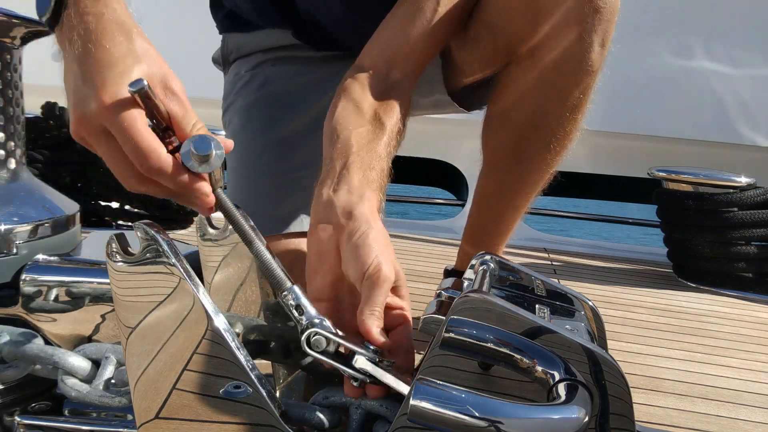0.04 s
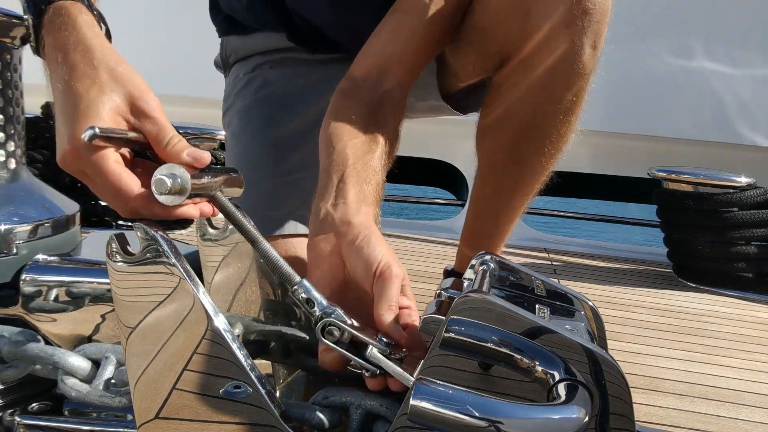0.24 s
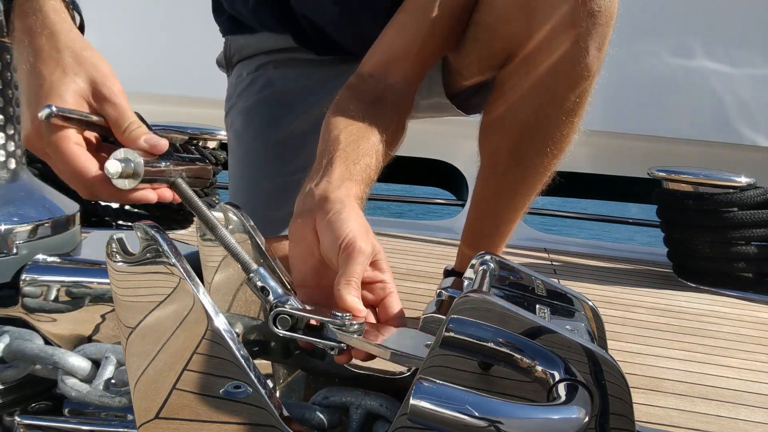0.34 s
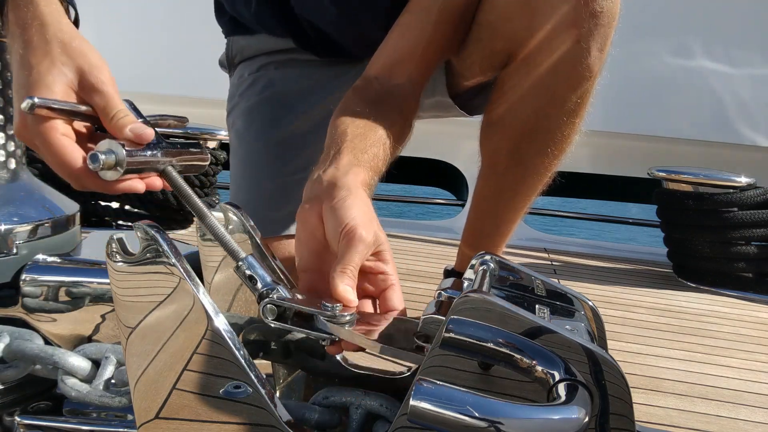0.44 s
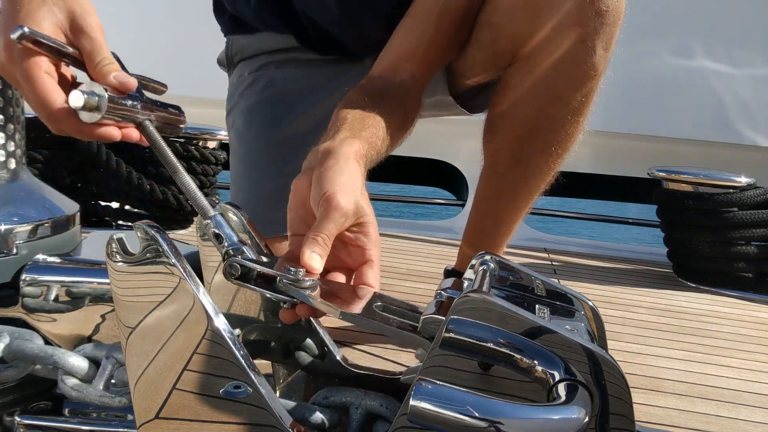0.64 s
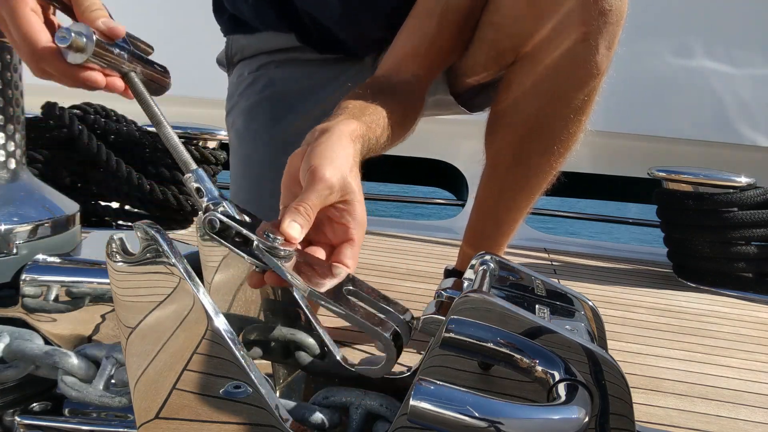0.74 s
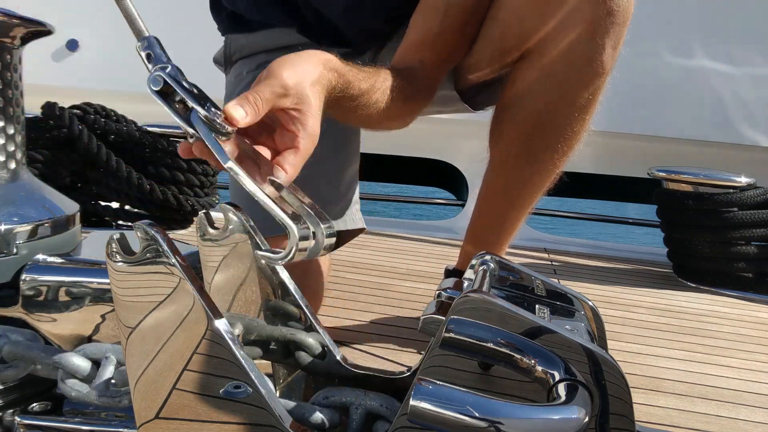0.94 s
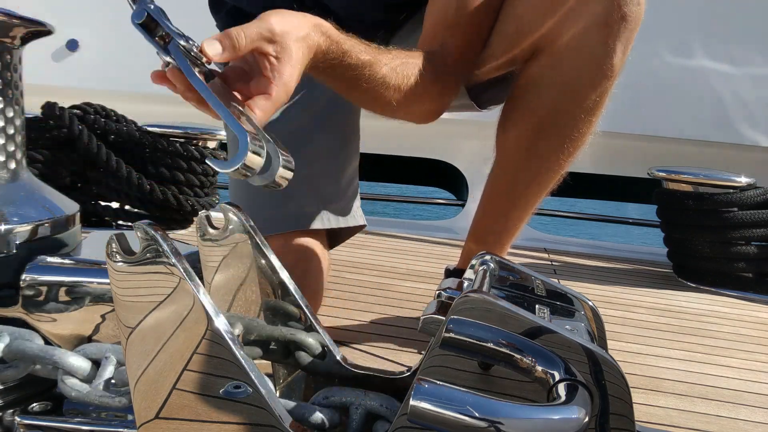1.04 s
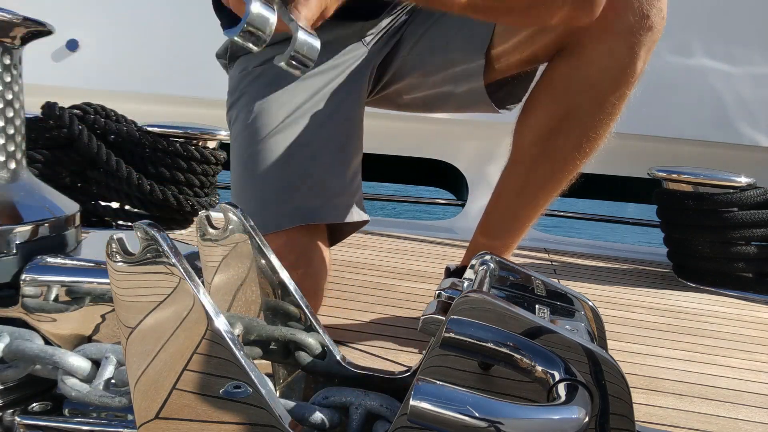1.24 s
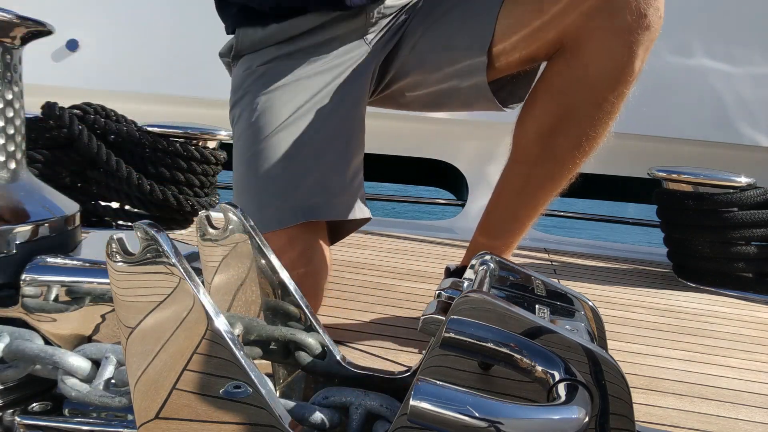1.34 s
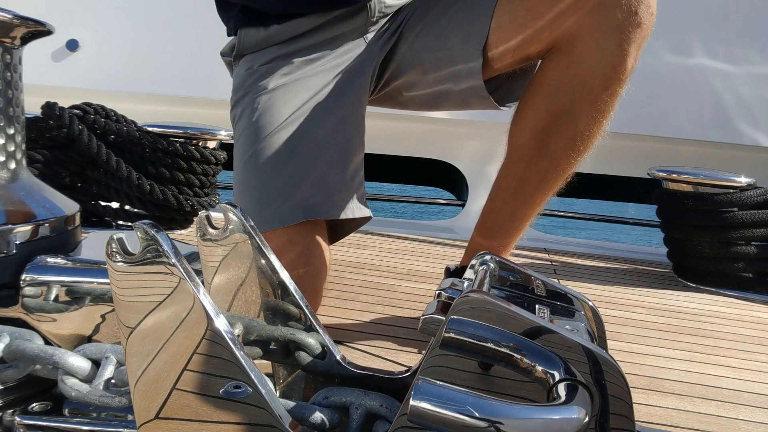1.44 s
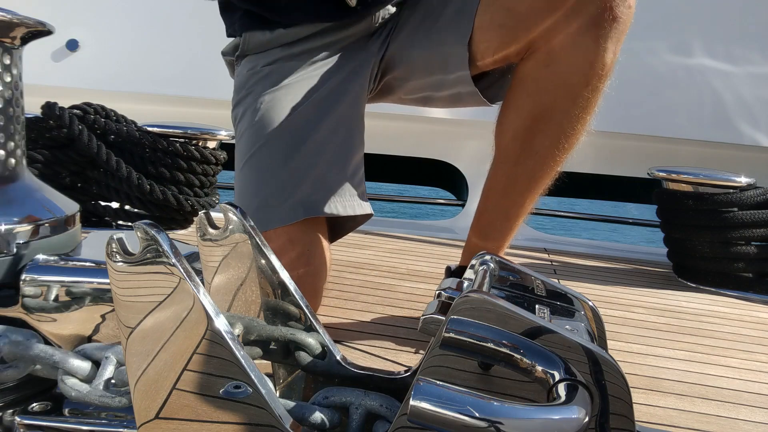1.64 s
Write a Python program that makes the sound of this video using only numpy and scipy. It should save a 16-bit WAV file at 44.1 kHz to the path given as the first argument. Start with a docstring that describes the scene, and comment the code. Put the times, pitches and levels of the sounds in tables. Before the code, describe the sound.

Metal clank of a heavy securing claw knocked off chain, ringing on, then faint ticks outdoors

```python
"""On a boat's foredeck in the open air, a steel securing claw is worked off an anchor chain, close by.
It scrapes, breaks loose with a rattling clank, knocks again and rings on as it is lifted away; fittings tick.
Contacts shape resonance-coloured noise; rod, claw, links and deck are sums of decaying modes; a groan slides.
A wavering sine hums low beneath, with filtered noise for the harbour air and the rumble of handling."""
import sys
import numpy as np
from scipy import signal
from scipy.fft import rfft, irfft
from scipy.io import wavfile

SR = 44100
rng = np.random.default_rng(int(sys.argv[2]) if len(sys.argv) > 2 else 0)


def master(y):
    """Save y as 16-bit WAV."""
    cut = np.clip(np.atleast_2d(y).T, -1, 1)
    pcm = np.round(cut * 32767)  # scale
    wavfile.write(sys.argv[1], SR, pcm.astype(np.int16))


N = 74970


def undb(db):
    """Level to amplitude: 20 dB is a factor of ten."""
    return 10 ** (np.asarray(db) / 20)


def unit(x):
    """Normalisation to an rms of 1."""
    return x / np.sqrt(np.mean(x ** 2))


def wander(size, step):
    """Slow random modulation of rms 1: random values every step points, joined by straight lines."""
    at = np.arange(size) / step
    return unit(np.interp(at, np.arange(size), rng.standard_normal(size)))


def noise(colour):
    """Spectral shaping: white noise weighted by (f/Hz, level/dB) points, at rms 1."""
    hz, db = np.array(colour).T
    f = np.maximum(np.fft.rfftfreq(N, 1 / SR), 1)
    gain = undb(np.interp(np.log(f), np.log(hz), db))
    return unit(irfft(rfft(rng.standard_normal(N)) * gain, N))


def since(start):
    """Elapsed time in seconds since start, zero before it."""
    return np.maximum(np.arange(N) / SR - start, 0)


def strike(start, rise, t60):
    """Impact envelope: a quick rise, then exponential decay by 60 dB in t60 seconds."""
    age = since(start)
    attack = 1 - np.exp(-age / max(rise, 1e-5))
    return attack * np.exp(-np.log(1000) * age / t60)


def ring(start, hz, t60, rise):
    """Free vibration of one struck mode: a decaying sine."""
    return strike(start, rise, t60) * np.sin(2 * np.pi * hz * since(start))


def struck(modes, blows):
    """Modal superposition: each mode keeps its phase while every blow adds to its amplitude."""
    age = since(blows[0][0])
    out = np.zeros(N)
    for hz, db, t60 in modes:
        swing = sum(undb(blow_db) * strike(start, 2e-4, t60) for start, blow_db in blows)
        out += undb(db) * swing * np.sin(2 * np.pi * hz * age)
    return out


def machinery_hum():
    """Frequency and amplitude modulation: a low sine whose pitch and level waver at random."""
    # swell of the hum: t/s, level relative to hum_db/dB
    hum_swell = [(0, -3.5), (.2, 6), (0.601, 0.5), (0.802, 5), (1.041, 4), (1.1, -1), (1.36, -3.5),
                 (1.469, 3), (1.7, 2.5)]
    hum_hz, hum_db = 75.8, -53.5
    waver, drift = 0.23, 0.013  # rms share of amplitude, of frequency
    hz = hum_hz * (1 + drift * wander(N, SR / 12))
    tone = np.sin(2 * np.pi * np.cumsum(hz) / SR)
    hum = unit((1 + waver * wander(N, SR / 10)) * tone)
    swell = np.interp(np.arange(N) / SR, *np.array(hum_swell).T)
    return undb(hum_db + swell) * hum


def harbour_air():
    """Stationary broadband noise: a steady spectrum weighted towards the low frequencies."""
    # spectrum of the air: f/Hz, relative level per Hz/dB
    air_colour = [(25, -28.5), (55, -5), (100, -8.5), (160, -8), (230, -19.5), (335, -24), (430, -21),
                  (730, -31.5), (1500, -32), (4000, -34.5), (8000, -41.5), (16000, -45.5)]
    air_db = -55.5
    return undb(air_db) * noise(air_colour)


def handling_rumble():
    """Amplitude-modulated noise: low-frequency rumble follows the handling."""
    # course of the rumble: t/s, level/dB
    rumble_levels = [(0, -43.5), (.12, -54), (.33, -45), (.45, -43), (.6, -49.5), (0.751, -52),
                     (1.05, -53.5), (1.3, -62), (1.7, -54)]
    # its spectrum: f/Hz, relative level/dB
    rumble_colour = [(30, -22), (70, -0.5), (160, -1), (300, -14.5), (600, -20.5), (1500, -30.5),
                     (6000, -49.5)]
    level = np.interp(np.arange(N) / SR, *np.array(rumble_levels).T)
    return noise(rumble_colour) * undb(level)


def tensioning_rod():
    """Added damping: the knocked rod rings in its modes until the tightening grip mutes it."""
    # rod modes: f/Hz, relative level/dB, t60 before muting/s
    rod_modes = [(449.5, -1.5, 1), (680, -13, .11), (950, -17, 0.19)]
    # knocks on the rod: t/s, level/dB
    rod_knocks = [(.009, -43), (0.148, -41.5), (0.171, -40)]
    held_s, fade_s = 0.18, 0.016  # start and time constant of the muting
    return struck(rod_modes, rod_knocks) * np.exp(-since(held_s) / fade_s)


def clatter():
    """High modal density: contacts excite chain and stopper as noise in bands; the deck answers late and long."""
    # steel-on-steel contacts: t/s, basic rise/s, basic t60/s, then level/dB at each of clatter_hz
    contacts = [ (0.14, 0.0023, 0.19, -64, -49.5, -71, -74, -94, -87),
                (0.167, 0.0099, 0.17, -43, -39, -44.5, -48.5, -44.5, -64),
                (0.1949, 0.00083, 0.055, -60, -50, -44, -33, -65, -65.5),
                (0.2115, 0.00031, 0.074, -45, -34.5, -18, -12.5, -10, -17),
                (0.2267, .002, .08, -46, -30.5, -44, -24, -20, -30),
                (0.2556, 0.0022, .08, -46, -36, -37, -29.5, -26.5, -34),
                (0.267, 0.0031, .09, -49, -38, -36, -45.5, -46, -55),
                (0.296, .002, 0.22, -39.5, -45.5, -51.5, -57, -39, -79),
                (0.375, 0.00093, 0.069, -48.5, -42, -53.5, -43, -45, -69),
                (.402, .003, 0.068, -42.5, -35.5, -37.5, -37.5, -54, -44),
                (0.486, 0.0021, 0.12, -39, -41.5, -45, -50.5, -62, -75),
                (0.5015, 0.00063, 0.041, -39, -32.5, -40, -20, -34, -43),
                (0.505, .0005, 0.032, -45.5, -36, -39.5, -22.5, -45, -54)]
    # frequencies of those levels: f/Hz
    clatter_hz = [180, 700, 2200, 5300, 9000, 13500]
    # broad colour of chain and stopper: f/Hz, level before band normalisation/dB
    body_colour = [(700, 3.5), (1100, -5), (1550, 3), (1850, -3), (2300, -1), (4500, -6), (5300, 1),
                   (6700, -4.5), (8000, -0.5), (8600, 4.5), (10000, 7.5), (11800, -3), (14500, -1),
                   (16000, -5)]
    tail_db, tail_t60_s = -23.5, .3  # the chain goes on shivering
    tail_knee_hz, tail_shortening = 1000, 0.41  # above the knee t60 falls with this power of frequency
    bass_hz, bass_lag_s, bass_t60_s = 260, 0.021, .3  # the deck's extra rise and decay, weighted to the bass
    resonance_hz, resonance_db = 55.05, 4  # spacing and rms depth of the dense steel resonances
    grain_db = 2.5  # rms depth of the chatter
    f = np.maximum(np.fft.rfftfreq(N, 1 / SR), 1)
    resonances = undb(resonance_db * wander(len(f), resonance_hz * N / SR))
    body = undb(np.interp(f, *np.array(body_colour).T))
    steel = rfft(rng.standard_normal(N)) * resonances * body
    chatter = unit(undb(grain_db * wander(N, SR / 1000)))
    out = np.zeros(N)
    for hz in 125 * 2 ** (np.arange(15) / 2):  # half-octave centres
        overlap = np.clip(1 - 2 * abs(np.log2(f / hz)), 0, 1)
        band = unit(irfft(steel * overlap, N))
        bass = 1 / (1 + (hz / bass_hz) ** 2)
        tail_t60 = tail_t60_s / max(hz / tail_knee_hz, 1) ** tail_shortening
        power = np.zeros(N)
        for start, rise, t60, *levels in contacts:
            rise = rise + bass * bass_lag_s
            fall = strike(start, rise, t60 + bass * bass_t60_s)
            fall = fall + undb(tail_db) * strike(start, rise, tail_t60)
            level = np.interp(np.log(hz), np.log(clatter_hz), levels)
            power += (fall * undb(level)) ** 2
        out += band * np.sqrt(power)
    return out * chatter


def claw():
    """Contact damping: each blow's ring is stopped in turn, briefly while pressed on the chain, long once free."""
    # claw modes: f/Hz, relative level/dB, t60 when free/s
    claw_modes = [(895, -7.5, 0.44), (1492, -4, 0.42), (3375, -18, .3), (3542, 3, 1.0), (4216, -2.5, .24),
                  (4985, 3.5, 0.052), (5240, 2, 0.094), (5680, -21.5, .4), (6500, -4, 0.42),
                  (7080, 1, 0.32), (8926, -1.5, 0.91), (10330, -3.5, 0.11), (11404, 0.5, .24)]
    # blows on the claw: t/s, stopped at t/s, share of free t60, then level/dB at each of claw_hz
    claw_blows = [ (.174, 0.207, 0.54, -42, -41, -63.5, -54.5, -58, -61.5),
                  (.197, 0.22, 0.42, -32, -33, -38, -42, -61, -60.5),
                  (0.2145, 0.293, 0.2, -41, -5.5, -33, -36, -19.5, -22.5),
                  (0.241, .3, 1, -43.5, -45.5, -50.5, -55, -27, -30.5),
                  (.298, 0.384, 1, -41.5, -39, -67, -44.5, -27, -45.5),
                  (0.387, 0.508, 1, -46.5, -60, -62, -59, -33, -76),
                  (.5022, 1.077, 0.93, -40.5, -42, -34.5, -69.5, -27, -23)]
    # frequencies of those levels: f/Hz
    claw_hz = [1500, 3540, 5000, 7100, 8920, 11390]
    stop_s, rise_s = 0.002, 0.00096
    # the claw turns and a silent lobe of one mode sweeps past
    node_s, node_width_s, node_mode_hz = 0.562, 0.025, 8919
    waver_db, waver_rate = 1.58, 25  # the claw moves in the hand: rms depth, new values per s
    t = np.arange(N) / SR
    gates = [.5 - .5 * np.tanh((t - blow[1]) / stop_s) for blow in claw_blows]
    out = np.zeros(N)
    for hz, db, t60 in claw_modes:
        swing = np.zeros(N)
        for (start, _, share, *levels), gate in zip(claw_blows, gates):
            level = db + np.interp(hz, claw_hz, levels)
            swing += undb(level) * strike(start, rise_s, t60 * share) * gate
        near_node_mode = abs(np.log(hz / node_mode_hz)) < .08
        lobe = np.tanh((node_s - t) / node_width_s) if near_node_mode else 1
        waver = undb(waver_db * wander(N, SR / waver_rate))
        out += swing * waver * lobe * np.sin(2 * np.pi * (hz * t + rng.random()))
    return out


def chain_links():
    """Modal superposition: blows ring the short, bright modes of links and shackle."""
    # link and shackle modes: f/Hz
    link_hz = [1276, 2343, 4129, 5472, 6010, 6073, 7293, 7724, 7877, 7965, 9441, 9802, 10163, 12655]
    # for each of those modes: relative level/dB, t60/s
    link_ring = [(-26.5, 0.18), (-13.5, 0.12), (-25, 0.11), (-13, .098), (1.5, 0.058), (-10, 0.091),
                 (-17.5, .11), (-12, 0.082), (-10, 0.056), (-10.5, .08), (-14.5, 0.13), (-10.5, .085),
                 (-13.5, .1), (-9, 0.067)]
    # blows that ring the links: t/s, level/dB
    link_blows = [(0.1978, -41), (0.213, -9.5), (0.2249, -7), (.2555, -28)]
    modes = [(hz, db, t60) for hz, (db, t60) in zip(link_hz, link_ring)]
    return struck(modes, link_blows)


def deck():
    """Structure-borne sound: thumps reach the deck and set off its low modes."""
    # deck modes: f/Hz, relative level/dB, t60/s
    deck_modes = [(137, -3, .2), (176, 0.5, 0.21), (243, -6, 0.23), (336.7, -9, 0.31), (514, -4.5, .14),
                  (715, -6.5, 0.18)]
    # thumps that reach it: t/s, level/dB
    deck_thumps = [(.213, -39.5), (0.505, -35)]
    return struck(deck_modes, deck_thumps)


def groan():
    """Exponential glide: a tone roughened by random modulation slides down as the clank dies."""
    start_s, end_s, level_db = 0.23, .345, -40.5
    start_hz, fall_s = 774, .047  # fall_s: time constant of the glide
    age = since(start_s)
    hz = start_hz * np.exp(-age / fall_s) * (1 + 0.1 * wander(N, SR / 300))
    gate = np.clip(np.minimum(age, end_s - start_s - age) / .006, 0, 1)
    roughness = 1 + .3 * wander(N, SR / 150)
    tone = np.sqrt(2) * np.sin(2 * np.pi * np.cumsum(hz) / SR)
    return undb(level_db) * gate * roughness * tone


def ticks():
    """Impulsive excitation: shifting fittings farther off give noise clicks and short modal pings."""
    # light ticks of the fittings: t/s, click level/dB
    tick_times = [(0.697, -43), (1.265, -54.5), (1.561, -51.5), (1.5735, -51.5), (1.663, -58.5)]
    # spectrum of the clicks: f/Hz, relative level/dB
    tick_colour = [(300, -24.5), (2200, -14), (3000, -2), (4300, 1.5), (6300, -3.5), (9300, -10),
                   (10500, -11), (16000, -28.5)]
    # modes that ping with the ticks: t/s, f/Hz, level/dB
    tick_pings = [(1.265, 1372, -53.5), (1.264, 2750, -53), (1.264, 4120, -48.5), (1.264, 5430, -51.5),
                  (1.265, 8170, -55), (1.542, 8100, -53.5), (1.5763, 3135, -47.5), (1.663, 3395, -57.5)]
    rise_s, click_t60_s, ring_t60_s = 0.0013, 0.033, 0.042
    envelope = sum(undb(db) * strike(start, rise_s, click_t60_s) for start, db in tick_times)
    clicks = noise(tick_colour) * envelope
    pings = sum(undb(db) * ring(start, hz, ring_t60_s, rise_s) for start, hz, db in tick_pings)
    return clicks + pings


def scene():
    """Linear superposition: all sources add at one microphone, close to the claw."""
    background = machinery_hum() + harbour_air() + handling_rumble()
    steel = tensioning_rod() + clatter() + claw() + chain_links()
    return (background + steel + deck() + groan() + ticks())[None]


def record(dry):
    """Saturation and band limiting: the recorder rounds the loudest peaks and cuts the top."""
    ceiling, top_hz = .82, 15700  # ceiling: share of full scale
    rounded = ceiling * np.tanh(dry / ceiling)
    low_pass = signal.ellip(8, .2, 70, top_hz, fs=SR, output="sos")
    return signal.sosfilt(low_pass, rounded)


dry = scene()
out = record(dry)
master(out)
```